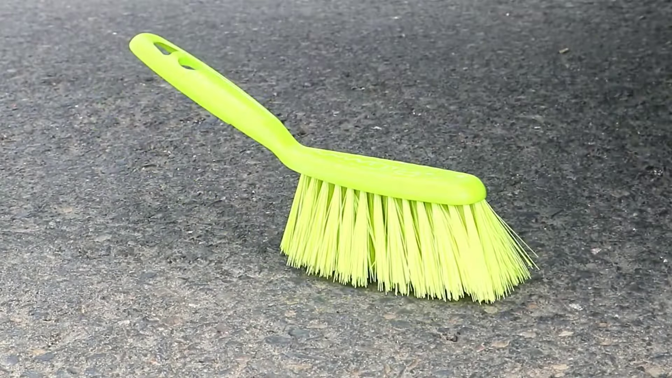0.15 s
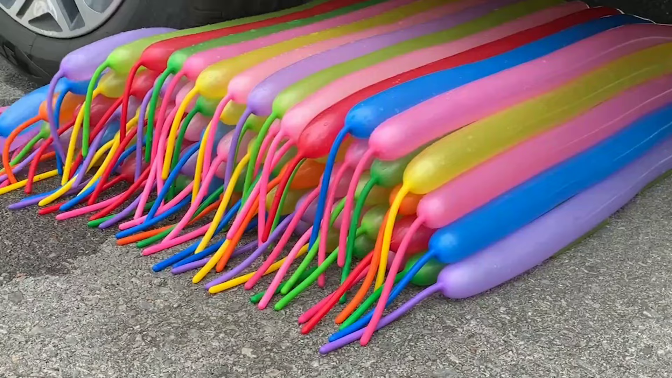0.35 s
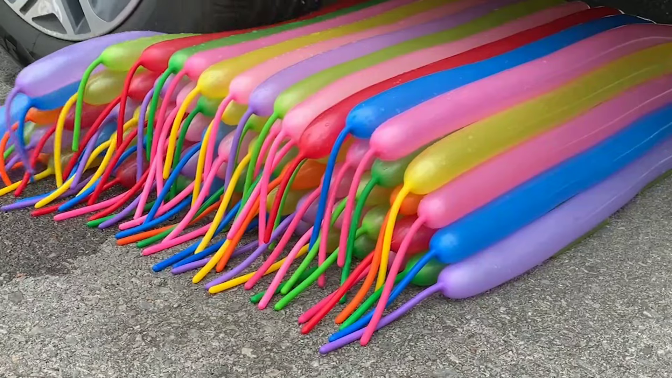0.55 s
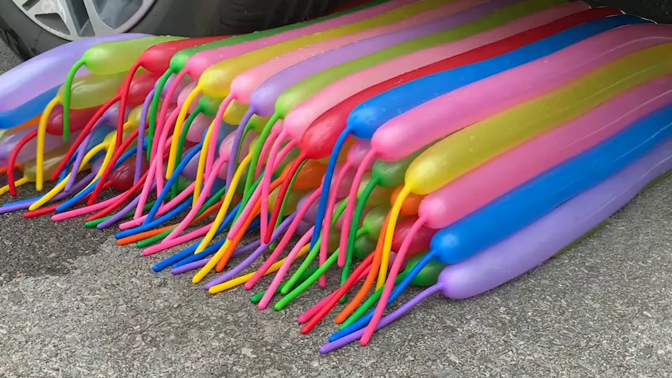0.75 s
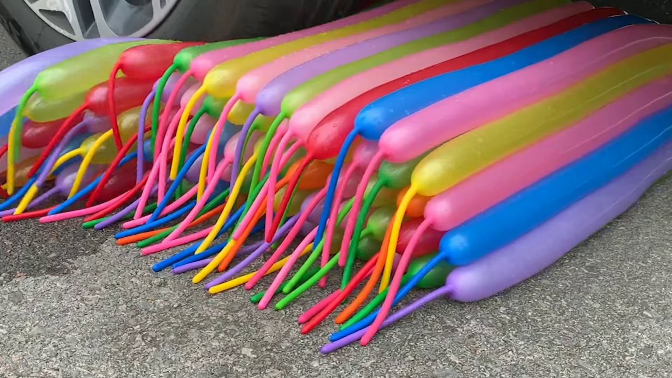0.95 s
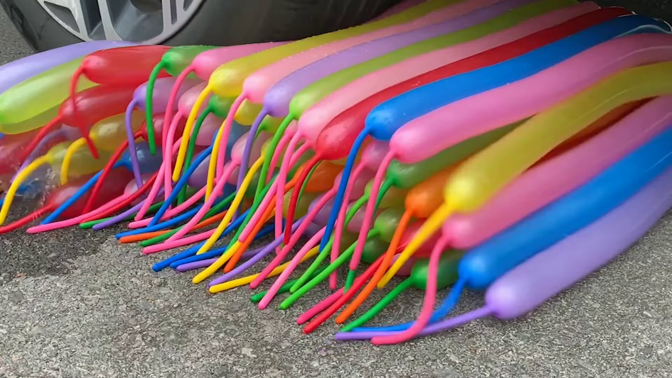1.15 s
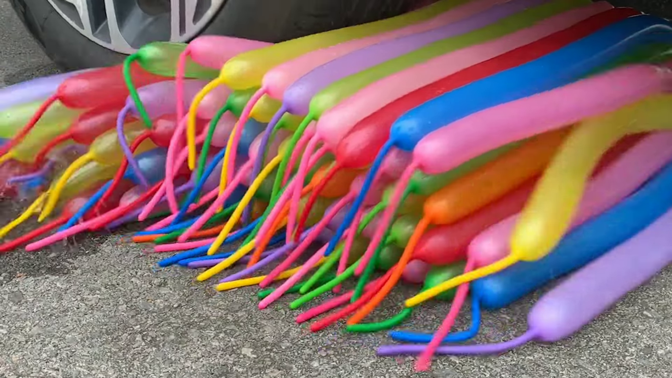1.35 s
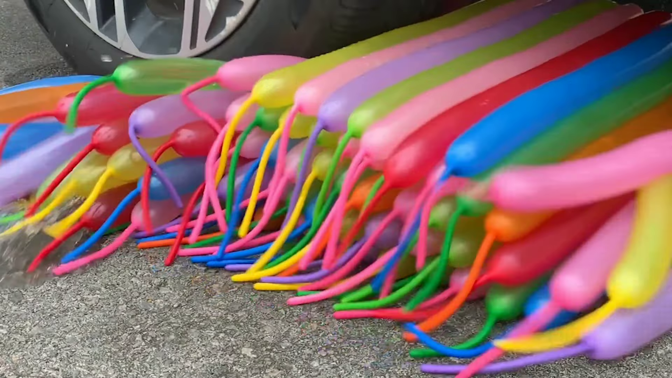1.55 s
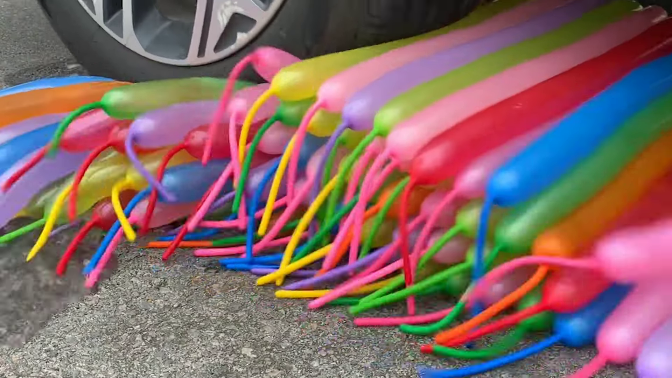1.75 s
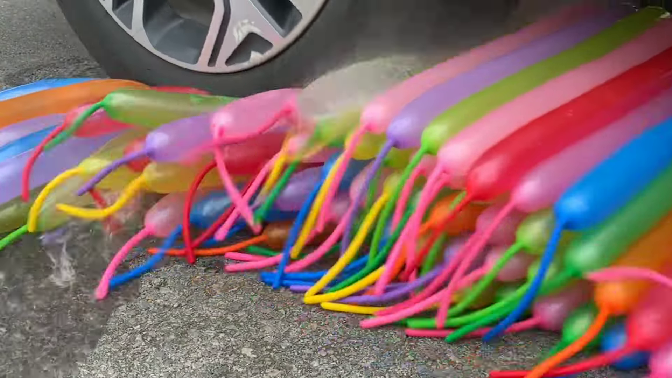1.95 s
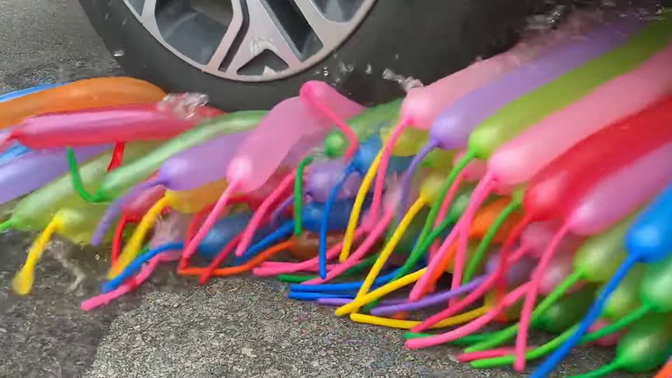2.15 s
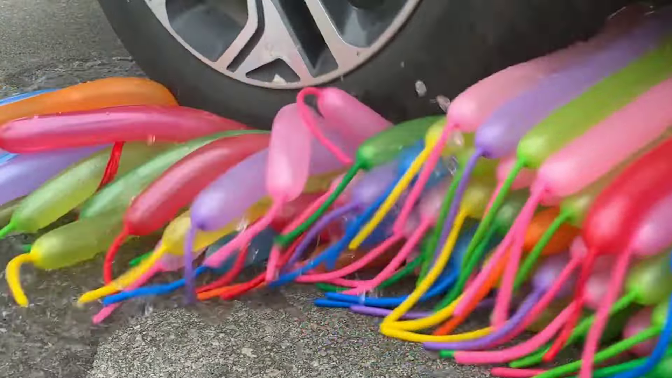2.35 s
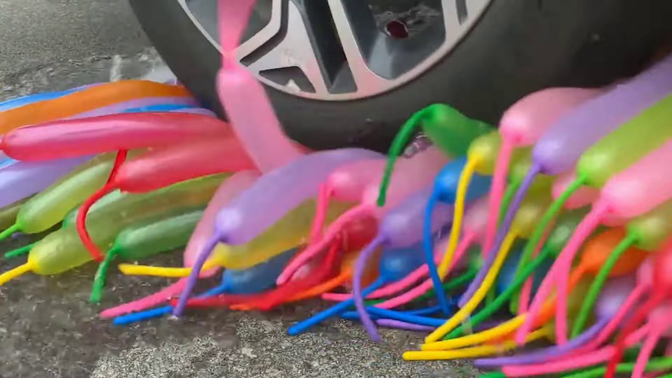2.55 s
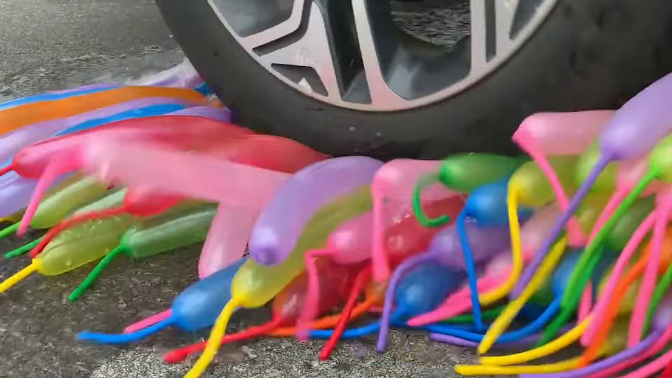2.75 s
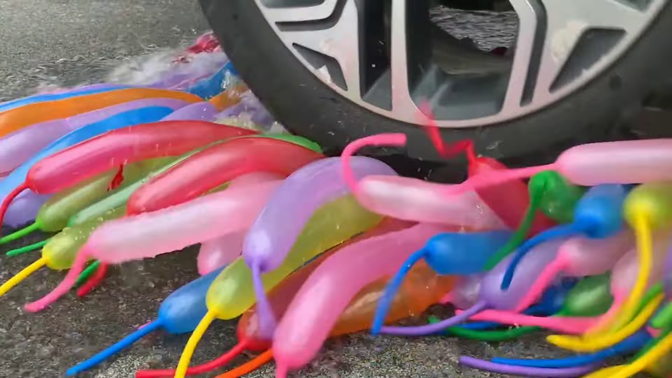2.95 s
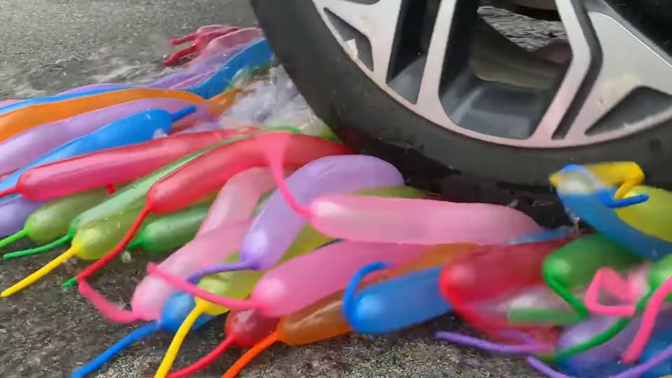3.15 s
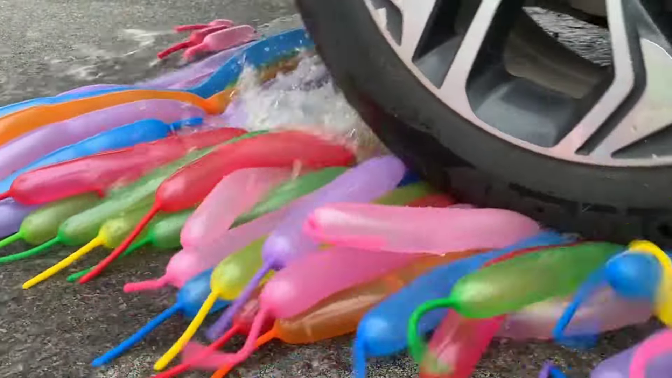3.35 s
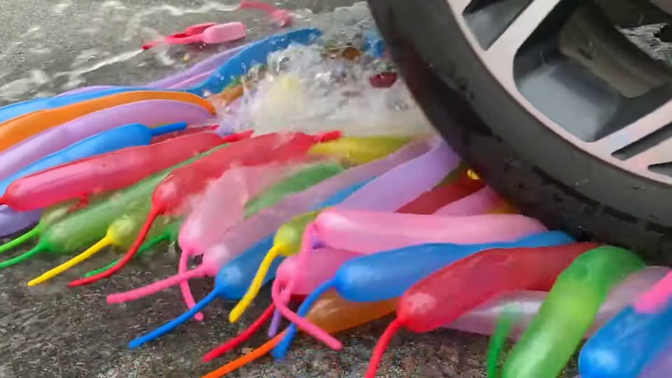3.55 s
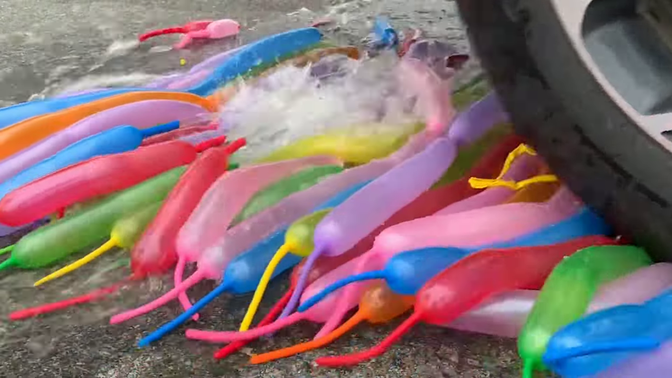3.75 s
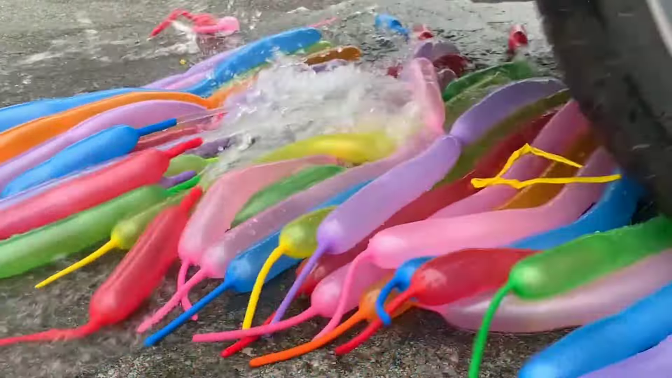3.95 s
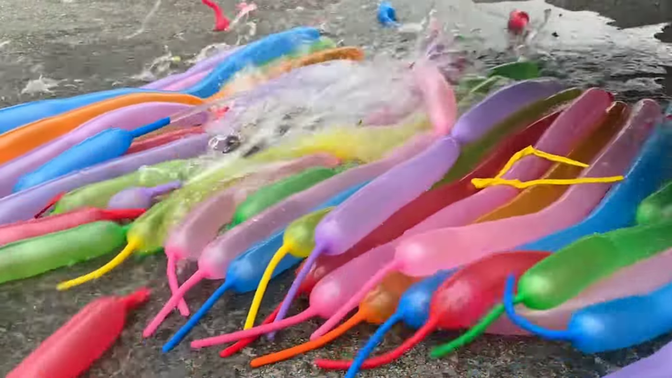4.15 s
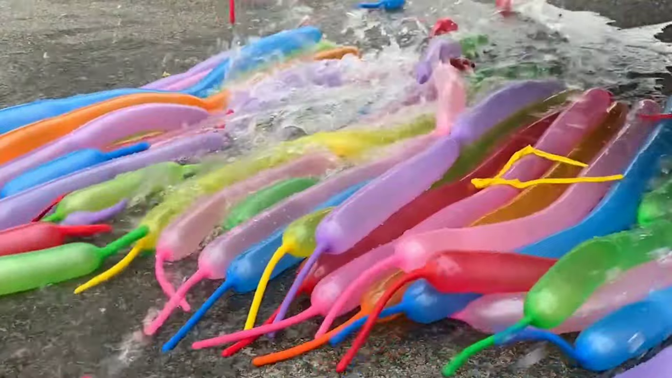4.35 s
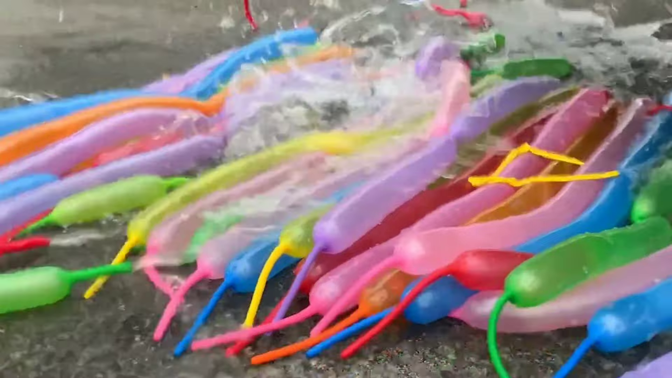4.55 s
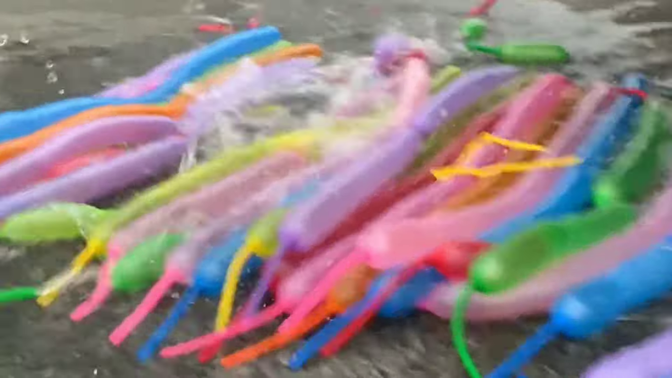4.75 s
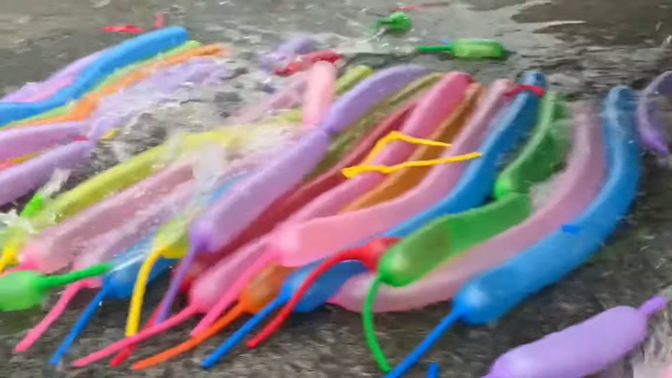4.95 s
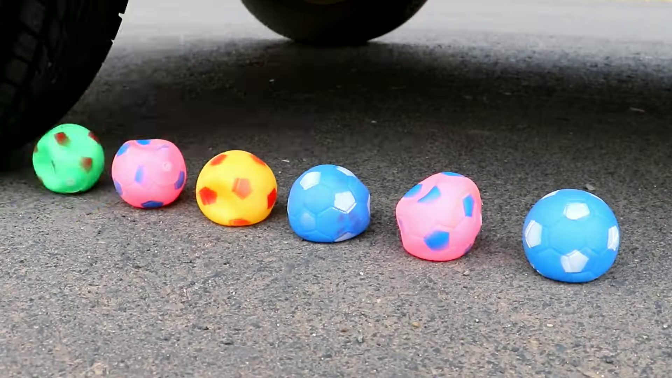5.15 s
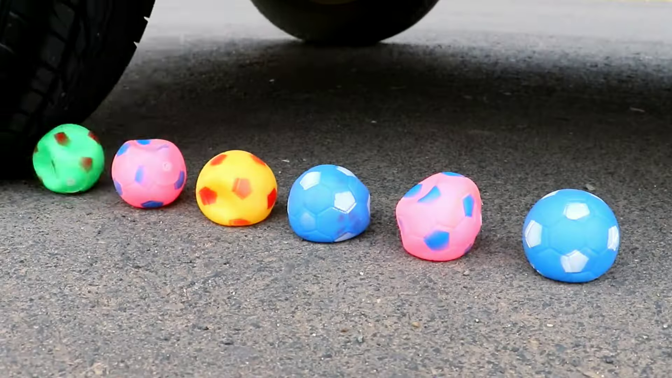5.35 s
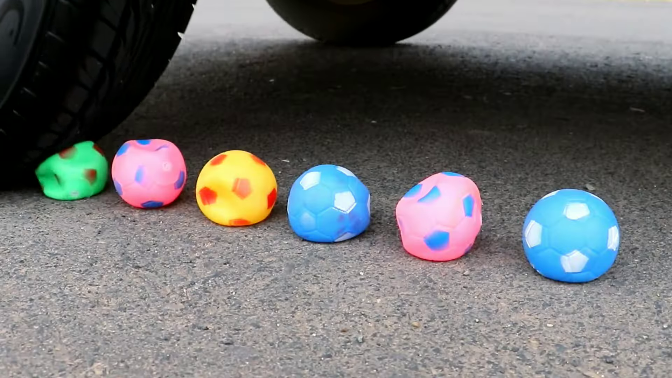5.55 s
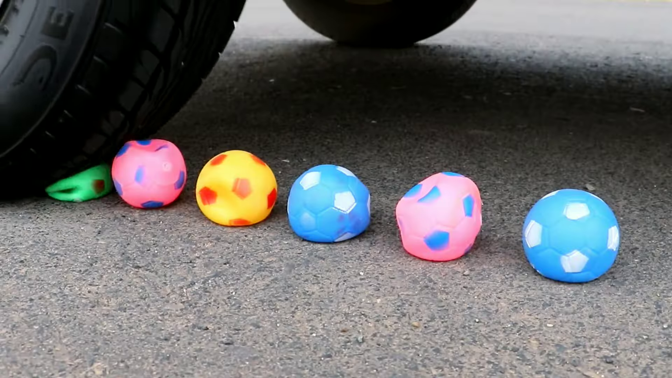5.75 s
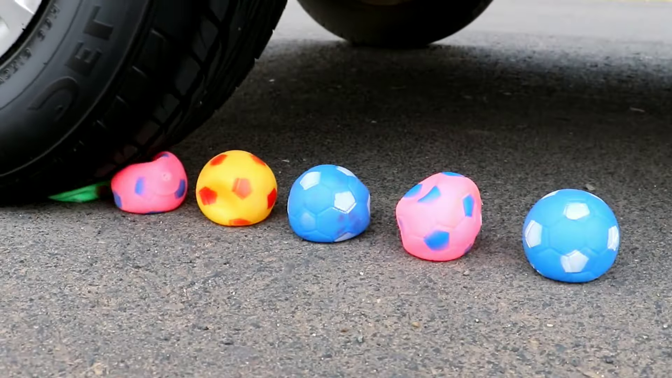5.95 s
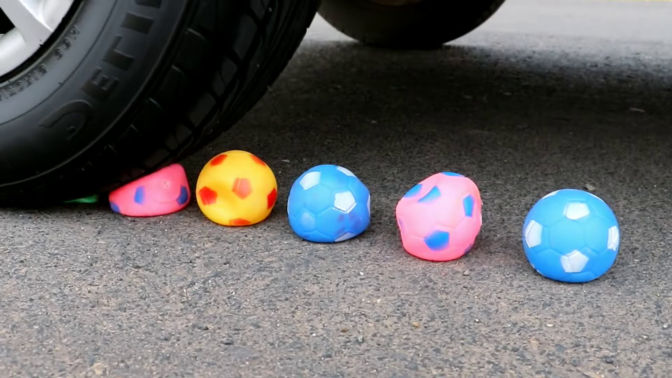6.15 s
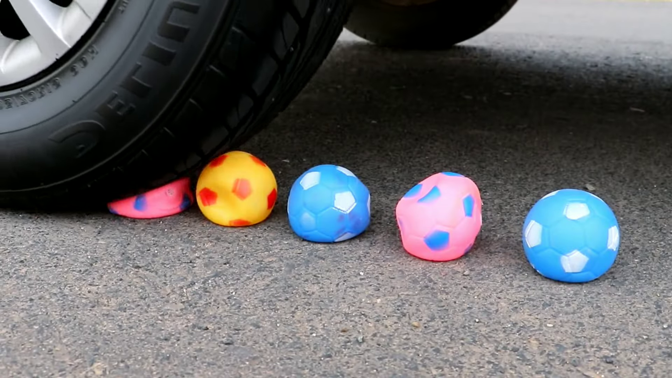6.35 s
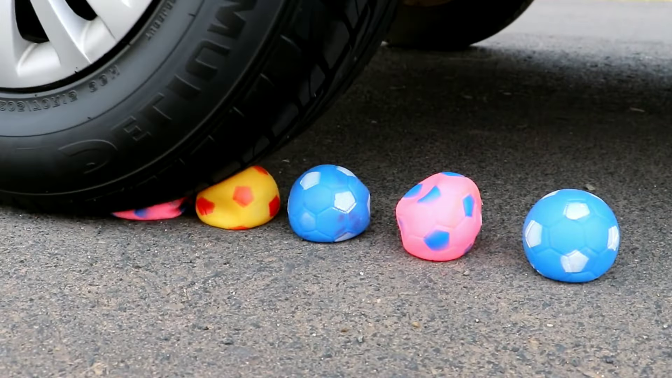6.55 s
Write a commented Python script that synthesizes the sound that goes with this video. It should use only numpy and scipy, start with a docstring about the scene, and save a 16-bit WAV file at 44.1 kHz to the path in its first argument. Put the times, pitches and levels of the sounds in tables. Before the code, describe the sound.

Near quiet on a roadside, with a small grit tick, then a faint tyre creak. A car tyre rolls onto long water balloons: sharp snaps, slapping splashes, short gushes, plopping air pockets and growing gurgle and spray over low rumble. An abrupt cut to quiet street air follows, where three squeaky balls squeal one by one, whistling and hissing. Close microphone, wide stereo for the water, squeaks centred.

```python
"""Asphalt roadside: a car tyre rolls over a heap of long water balloons, then, in a quieter spot, over squeaker balls.
Balloons snap, gush and splatter as shaped noise bursts; ringing air pockets and bubbles gurgle over the car's rumble.
Three rubber balls squeak one after another: harmonic reeds glide with the pressure, choke into a whistle,
and the last air hisses out as bright noise. Faint street air lies before the heap and under the balls."""
import sys
import numpy as np
from scipy import signal
from scipy.fft import rfft, irfft, next_fast_len
from scipy.io import wavfile
from scipy.ndimage import uniform_filter1d

SR = 44100
rng = np.random.default_rng(int(sys.argv[2]) if len(sys.argv) > 2 else 0)


def pcm_store(signal):
    """Save signal as 16-bit PCM."""
    levels = np.round(np.clip(np.atleast_2d(signal), -1, 1) * 32767)
    wavfile.write(sys.argv[1], SR, levels.astype(np.int16).T)


N = 291809
T = np.arange(N) / SR
HEAP_START, HEAP_END = .285, 5.186  # s
TOP_HZ = 15700  # upper band limit


def amp(db):
    """Decibels to gain."""
    return 10 ** (np.asarray(db) / 20)


def unit(x):
    """Scaled to rms 1."""
    return x / np.sqrt(np.mean(x ** 2) + 1e-20)


def along(points, hz):
    """(Hz, value) points read on a log frequency axis."""
    f, v = np.transpose(points)
    return np.interp(np.log(hz + 1), np.log(f + 1), v)


def curve(rows, t=T):
    """(s, value) points joined by straight lines, read at the times t."""
    s, value = np.transpose(rows)
    return np.interp(t, s, value)


def wobble(rate, size=N):
    """A smooth random curve, rate knots a second."""
    step = SR / rate
    knots = rng.standard_normal(int(size / step) + 4)
    fine = signal.resample_poly(knots, 8, 1)
    return np.interp(np.arange(size) * 8 / step, np.arange(len(fine)), fine)


def filtered(x, response):
    """x times a response of frequency."""
    size = x.shape[-1]
    padded = next_fast_len(size + 4096)
    hz = np.fft.rfftfreq(padded, 1 / SR)
    return irfft(rfft(x, padded) * response(hz), padded)[..., :size]


def coloured(x, spectrum, tilt_db=0):
    """x given a spectrum and a tilt per octave about 1 kHz, at rms 1."""
    def response(hz):
        octaves = np.log2(np.clip(hz, 200, 8000) / 1000)
        return amp(along(spectrum, hz) + tilt_db * octaves)
    return unit(filtered(x, response))


def lowered_above_8k(spectrum, loss_db):
    """The spectrum lowered by loss_db above 8 kHz; a negative loss leaves it as it is."""
    return [(hz, db - max(loss_db, 0) * (hz > 8000)) for hz, db in spectrum]


def noise(size=N):
    """Two unrelated white noises."""
    return rng.standard_normal((2, size))


def widened(pair, width):
    """The first signal in the centre, the second in opposite phase at the sides."""
    mid, side = pair
    return mid + width * np.array([side, -side])


def gate(start, end):
    """1 between two times, with 4 ms ramps."""
    return np.clip(np.minimum(T - start, end - T) / .004, 0, 1)


def span(start, end):
    """The sample times between two moments."""
    return np.arange(round(start * SR), round(end * SR)) / SR


def scattered(start, end, count):
    """Random moments, one in each equal part of a span."""
    return start + (end - start) * (np.arange(count) + rng.random(count)) / count


def add(out, x, s):
    """Mix x into out from time s."""
    part = out[:, max(round(s * SR), 0):][:, :x.shape[-1]]
    part += x[..., :part.shape[1]]


# Balloon skins snapping: t/s, crack level/dB, splash level/dB (both before their envelopes), air pocket f/Hz
SNAPS = [(1.246, -7, -4.5, 578), (1.8, -40, -18, 777), (1.998, -26, -10, 677), (2.053, -6.5, -11, 520),
         (2.388, -41, -21, 200), (2.969, -8.5, -4.5, 423), (3.105, -33, -17.5, 557),
         (3.526, -11.5, -19.5, 384), (3.709, -5.5, -18, 479), (3.856, -9.5, -15.5, 360),
         (4.289, -12, -10, 252), (4.491, -18, -10.5, 265.5), (4.557, -23, -6, 286), (5.11, -6.5, -7, 735)]
# Tone of the ripping skin: f/Hz, level/dB
CRACK_TONE = [(700, -21.5), (2200, -10.5), (3600, 3), (5500, -7), (7500, -16), (9500, -26.5),
              (15500, -29.5)]
# Tone of the slapping water: f/Hz, level/dB
SPLASH_TONE = [(60, -19.5), (190, 7), (450, -4), (900, 0.5), (1600, -12.5), (3000, -10.5), (8000, -60)]
SPLASH_T60_S = .11


def pops():
    """The skin rips in a burst of a few milliseconds; the freed water slaps and dies away over a longer tail."""
    out, t = np.zeros((2, N)), np.arange(SR // 4) / SR
    tail = amp(-60 * t / SPLASH_T60_S)
    rip = np.exp(-((t - .0055) / .0023) ** 2) + amp(-8) * tail
    for s, crack_db, splash_db, _ in SNAPS:
        crack_tone = lowered_above_8k(CRACK_TONE, 3.2 * (-26 - crack_db))
        crack = coloured(noise(len(t)), crack_tone) * (1 - np.exp(-t / .001)) * rip
        splash = coloured(noise(len(t)), SPLASH_TONE) * (1 - np.exp(-t / .0016)) * tail
        add(out, amp(crack_db) * crack + amp(splash_db) * splash, s)
    return out


# Jets from split balloons: crest t/s, level/dB (before JET_LIFT_DB), swell time constant/s,
# treble tilt/(dB per octave), air pocket f/Hz
JETS = [(1.275, -18, .025, -2, 213), (1.354, -20.5, .009, -6, 680), (1.405, -9, .011, -3, 474),
        (1.476, -26.5, 0.023, -3, 333), (1.611, -23.5, 0.012, -1, 515), (1.691, -26, 0.007, 1, 466),
        (1.82, -20.5, 0.011, -8.5, 220), (1.875, -20.5, 0.015, -3.5, 327), (2.029, -13, .011, 0.5, 980),
        (2.103, -23, 0.035, -0.5, 286), (2.861, -20.5, 0.0083, 4, 227), (2.925, -23.5, 0.0085, 0.5, 359),
        (3.536, -17.5, 0.015, 3.5, 231), (3.669, -12.5, .013, 0, 1100), (3.717, -11.5, 0.013, 0.5, 226),
        (3.816, -20.5, 0.012, 2.5, 350), (3.985, -17.5, 0.014, 1.5, 457), (4.057, -17.5, .014, 1, 440),
        (4.239, -12, 0.0094, 2.5, 296), (4.384, -19, 0.024, -1.5, 295), (4.454, -18, 0.013, 3.5, 344),
        (4.5, -13, 0.019, 1, 255), (4.599, -13, 0.011, 3, 290), (5.066, -15.5, 0.013, 4, 368)]
# Tone of a jet: f/Hz, level/dB
JET_TONE = [(80, -27.5), (200, 1.5), (600, 2), (1200, -1), (2300, -6.5), (3700, -4.5), (5500, -11.5),
            (7500, -22), (8600, -33.5), (15000, -37.5)]
JET_LIFT_DB = 5
DRAIN_OVER_SWELL = 1.17  # a jet dies away a little more slowly than it rises
SQUIRT_SWELL_S = .011
SQUIRT_DB, SQUIRT_SCATTER_DB = 2, 3.5  # level over the slosh setting, and how far it varies either way


def gushes():
    """Each jet swells as the split widens, flutters with the loose rubber and drains; squirts come at random."""
    out, t = np.zeros((2, N)), np.arange(-SR // 10, SR // 7) / SR

    def jet(swell, loss_db, tilt_db):
        fluttering = amp(1.9 * wobble(349.4, size=len(t))) * noise(len(t))
        flow = np.exp(-np.abs(t) / np.where(t < 0, swell, DRAIN_OVER_SWELL * swell))
        return flow * coloured(fluttering, lowered_above_8k(JET_TONE, loss_db), tilt_db)

    for s, db, swell, tilt_db, _ in JETS:
        add(out, amp(db + JET_LIFT_DB) * jet(swell, 4 * (-16 - db), tilt_db), s + t[0])
    for s in scattered(WET_START_S, HEAP_END, count=22):
        slosh_db = SLOSH_DB + SLOSH_GROWTH_DB * flood(s)
        db = slosh_db + SQUIRT_DB + SQUIRT_SCATTER_DB * rng.uniform(-1, 1)
        add(out, amp(db) * jet(SQUIRT_SWELL_S, loss_db=23, tilt_db=1.5), s + t[0])
    return out


PLOP_CYCLES, PLOP_DELAY_S = 33, .00654  # cycles per 60 dB of decay; lag behind a snap
POP_PLOP_DB, GUSH_PLOP_DB = -1.5, -.5  # relative to the tabled splash or jet level


def plops():
    """Every snap and jet leaves an air pocket ringing at its own pitch, rising and unsteady as its wall moves."""
    out, t = np.zeros((2, N)), np.arange(SR // 6) / SR
    pockets = [(s + PLOP_DELAY_S, hz, db + POP_PLOP_DB) for s, _, db, hz in SNAPS]
    pockets += [(s, hz, db + GUSH_PLOP_DB) for s, db, *_, hz in JETS]
    right_lag = np.array([[0], [-.8]])  # radians
    for s, hz, db in pockets:
        t60 = PLOP_CYCLES / hz
        pitch = hz * (1 + .11 * (t / t60 - .2) + .024 * wobble(200, size=len(t)))
        tone = np.sin(2 * np.pi * np.cumsum(pitch) / SR + right_lag)
        ring = tone * (1 - np.exp(-t / .0005)) * amp(-60 * t / t60)
        add(out, amp(db) * ring, s)
    return out


FLOOD_START_S, FLOOD_FULL_S = 2.05, 4.52


def flood(t):
    """How much water is loose, 0-1, growing steadily while the tyre crosses the heap."""
    return np.clip((t - FLOOD_START_S) / (FLOOD_FULL_S - FLOOD_START_S), 0, 1)


def bubbles(count, size, hz, spread, cycles, scatter_db):
    """Two channels of small damped rings whose pitch rises as they die."""
    t = np.arange(size) / SR
    when, side, chance = rng.random((count, 3)).T[:, :, None]
    pitch = np.clip(hz * np.exp(spread * rng.standard_normal((count, 1))), 170, 6500)
    age = t * pitch / cycles
    tone = np.sin(2 * np.pi * pitch * t * (1 + .092 * np.minimum(age, 2)))
    ring = tone * np.exp(-3 * age) * (1 - t / t[-1])
    ring *= amp(-scatter_db * np.log(chance + .04))
    ring *= np.minimum(t * pitch, 1)  # a bubble takes a cycle to start
    index = (when * (N - size)).astype(int) + N * (side > .5) + np.arange(size)
    return unit(np.bincount(index.ravel(), ring.ravel(), 2 * N).reshape(2, N))


def patchy(x, depth_db):
    """Gains that wander over time and frequency, as splashes hit rubber, puddle or road."""
    z = signal.stft(x, nperseg=512)[2]
    field = uniform_filter1d(rng.standard_normal(z.shape[1:]), size=9, axis=0)
    field = uniform_filter1d(field, size=8, axis=1)
    return unit(signal.istft(z * amp(depth_db * unit(field)), nperseg=512)[1][:, :N])


# Tone of water sloshing in the heap: f/Hz, level/dB
SLOSH_TONE = [(53, -48.5), (90, -8), (248, 1.5), (323, -2.5), (442, -2), (527, -7.5), (739, -4.5),
              (1300, -14), (1400, -13.5), (1800, -10.5), (2340, -42), (3960, -120)]
# Tone of pattering drops: f/Hz, level/dB
SPRAY_TONE = [(500, -12.5), (1000, -1), (1700, -1.5), (2400, -0.5), (3700, 2.5), (5000, -3.5),
              (6300, -12.5), (7600, -18), (8200, -68.5), (15000, -65.5)]
WET_START_S = 1.19
SLOSH_DB, SLOSH_GROWTH_DB = -29, 9.5  # level before the flood, and its gain at full flood
SPRAY_DB, SPRAY_GROWTH_DB = -38.5, 20


def water():
    """Pockets of air gurgle in the heap while drops patter on rubber and asphalt."""
    gurgle = bubbles(count=1500, size=900, hz=425.7, spread=.456, cycles=23.5, scatter_db=1.5)
    slosh = unit(.74 * gurgle + coloured(noise(), SLOSH_TONE))
    drops = bubbles(count=9000, size=160, hz=2547, spread=.6, cycles=5, scatter_db=-.5)
    spray = patchy(coloured(drops + 2.43 * noise(), SPRAY_TONE), depth_db=2.96)
    surge = wobble(22)
    slosh_db = SLOSH_DB + SLOSH_GROWTH_DB * flood(T) + 1.8 * surge
    spray_db = SPRAY_DB + SPRAY_GROWTH_DB * flood(T) + .93 * surge
    return gate(WET_START_S, HEAP_END) * (amp(slosh_db) * slosh + amp(spray_db) * spray)


# Likeness of the two microphone ports by the heap: f/Hz, correlation (0-1)
PORT_LIKENESS = [(50, .88), (160, 0.77), (300, 0.63), (480, 0.2), (760, 0.15), (1400, 0.059), (2500, 0.38),
                 (3700, 0.61), (6000, 0.79), (9000, 0.17)]
# Phase by which the left port leads: f/Hz, lead/rad
PORT_LEAD = [(40, 0), (280, 1.4), (500, 3), (1000, 6), (2900, 9.3), (4700, 3.1), (6500, -3.1), (16000, -36)]


def ports(pair):
    """Two unrelated signals become left and right: partly alike, and shifted in phase."""
    def blend(hz):
        turn = np.arccos(np.clip(along(PORT_LIKENESS, hz), 0, 1)) / 2
        return np.array([np.cos(turn), np.sin(turn)])

    def shift(hz):
        lead = np.interp(hz, *np.transpose(PORT_LEAD))
        return np.exp(.5j * np.outer([1, -1], lead))

    mid, side = filtered(pair, blend)
    return filtered(np.array([mid + side, mid - side]), shift)


# How the ball's shell radiates the reed: f/Hz, level/dB
SHELL_TONE = [(450, -36), (850, 0), (1400, 2.5), (1900, 2), (2700, -3.5), (3700, -2.5), (5000, 1),
              (6300, -4.5), (7600, 2), (8500, -1), (9700, -15.5), (11000, -21), (15000, -33.5)]
# Turbulent air at the reed: f/Hz, level/dB
RUSH_TONE = [(40, -4), (150, -12), (500, -11.5), (1000, -9), (2500, -8), (5000, 9), (8500, -9.5),
             (10500, -7), (14500, -7.5)]


def reed(t, pitch, db, rough, tilt_db):
    """A reed chops air into a harmonic tone; driven hard, it shakes, beats unevenly and air rushes past."""
    size = len(t)
    shaken = pitch * (1 + .067 * rough * wobble(1400, size) + .0037 * wobble(150, size))
    phase = 2 * np.pi * np.cumsum(shaken) / SR
    order = np.arange(1, 21)[:, None]
    overtone_hz = order * pitch
    strength = amp(along(SHELL_TONE, overtone_hz) + tilt_db * np.log2(order)) * (overtone_hz < TOP_HZ)
    strength /= np.sqrt(np.sum(strength ** 2, axis=0) / 2 + 1e-12)
    # each overtone wavers by itself, the fundamental stays even
    shimmer = amp(3.6 * (order > 1) * np.array([wobble(61.6, size) for _ in order]))
    tone = np.sum(shimmer * strength * np.sin(order * phase), axis=0)
    # every third beat is stronger: lines between the harmonics, for notes below 2200 Hz
    rasp = np.minimum(2 * rough, .6) * np.sin(phase / 3 + wobble(80, size)) * (pitch < 2200)
    flutter = 1.18 * rough * wobble(500, size)
    # the small vent radiates no bass
    tone = filtered(tone * (1.05 + rasp + flutter), lambda hz: 1 - 1 / (1 + (hz / 740) ** 14))
    rush = widened(coloured(noise(size), RUSH_TONE), .45)
    return amp(db) * (tone + (.023 + .5 * rough) * rush)


FADE_DB = 32  # depth of every attack and release below the held level


def fade_db(t, attack, release):
    """Attack, hold and release over the times t, in dB."""
    ramps = np.minimum((t - t[0]) / attack, (t[-1] - t) / release)
    return FADE_DB * (np.minimum(ramps, 1) - 1)


# Balls being squeezed: start t/s, end t/s, attack/s, level/dB (before pressure), overtone tilt/(dB per octave),
# tilt lost at full pressure/(dB per octave), roughness gained/(per octave of pitch)
SQUEEZE_NOTES = [(5.52, 5.681, 0.041, -18.5, 0, -2, 0.3), (5.902, 6.212, 0.011, -22, 3.5, 4.5, 0),
                 (6.494, 6.7, 0.011, -21, -2.5, 8, 0.2)]
# Reed pitch of each ball in turn: t/s, f/Hz
FIRST_GLIDE = [(5.52, 888.2), (5.554, 898), (5.59, 970), (5.608, 1038), (5.614, 1202), (5.628, 1246),
               (5.65, 1737), (5.685, 1866)]
SECOND_GLIDE = [(5.903, 899), (5.995, 1050), (6.089, 1393), (6.109, 1361), (6.123, 1672), (6.161, 1795),
                (6.191, 1895), (6.225, 2043)]
THIRD_GLIDE = [(6.495, 914), (6.569, 1004), (6.585, 993), (6.615, 1046)]
REST_HZ, REST_ROUGH = 900, .059  # the reed at the lightest pressure
PRESSURE_DB, PRESSURE_OCTAVES = 9, .49  # louder with pitch, levelling off beyond this interval
RELEASE_S, RELEASE_ROUGH = .032, .97


def squeezes():
    """Rising pressure drives the reed higher and louder; the note breaks up and fades as the air runs out."""
    out = np.zeros((2, N))
    for note, glide in zip(SQUEEZE_NOTES, (FIRST_GLIDE, SECOND_GLIDE, THIRD_GLIDE)):
        start, end, attack, db, tilt_db, loss_db, roughening = note
        t = span(start, end)
        pitch = curve(glide, t)
        octaves = np.maximum(np.log2(pitch / REST_HZ), 0)
        pressure = np.tanh(octaves / PRESSURE_OCTAVES)
        level_db = db + PRESSURE_DB * pressure + fade_db(t, attack, RELEASE_S)
        rough = REST_ROUGH + roughening * octaves + RELEASE_ROUGH * np.exp((t - end) / RELEASE_S)
        add(out, reed(t, pitch, level_db, np.clip(rough, 0, 1), tilt_db - loss_db * pressure), start)
    return out


# Nearly flat balls choking onto other notes, and (third row) a low undertone two octaves under the second
# ball's squeezed note: start t/s, climb/s, end t/s, from f/Hz, to f/Hz, level/dB, # starting roughness (0-1),
# overtone tilt/(dB per octave)
CHOKED_NOTES = [(5.646, .022, 5.692, 2664, 3040, -16, 0.6, -4),
                (5.648, .053, 5.728, 4070, 5150, -10.5, .7, -13.5),
                (6.139, .06, 6.208, 429, 482, -22.5, 0.3, 3.5),
                (6.17, 0.044, 6.222, 2675, 2980, -19, .9, -3),
                (6.2, 0.053, 6.26, 4620, 4920, -33, 0.7, -11)]
CHOKE_ATTACK_S, CHOKE_RELEASE_S = .011, .018


def chokes():
    """The choked reed climbs unsteadily, and turns pure once it settles on its note."""
    out = np.zeros((2, N))
    for start, climb, end, from_hz, to_hz, db, start_rough, tilt_db in CHOKED_NOTES:
        t = span(start, end)
        settled = np.minimum((t - start) / climb, 1)
        pitch = from_hz + (to_hz - from_hz) * settled
        level_db = db + fade_db(t, CHOKE_ATTACK_S, CHOKE_RELEASE_S)
        rough = start_rough * np.sqrt(np.abs(1 - settled))
        add(out, reed(t, pitch, level_db, rough, tilt_db), start)
    return out


# Choked reeds coming free: start t/s, swoop t/s, end t/s, swoop width/s, whistle f/Hz, low f/Hz
# (both before the sag), whistle level/dB
SWOOP_NOTES = [(5.996, 6.052, 6.17, .0085, 4635, 1153, -7.5), (6.499, 6.533, 6.7, 0.0065, 4566, 943, -15.5)]
SAG_OCTAVES_PER_S, SWOOP_LOSS_DB, WHISTLE_ROUGH = 2.5, 10.5, .3  # roughness is on top of REST_ROUGH
LOW_TILT_DB, WHISTLE_TILT_DB = -1, -7  # overtones per octave: the whistle is purer than the low note
SWOOP_ATTACK_S, SWOOP_RELEASE_S = .02, .053


def swoops():
    """A rough whistle drops to a softer low note, sagging all the while as the pressure eases."""
    out = np.zeros((2, N))
    for start, s, end, width, whistle_hz, low_hz, db in SWOOP_NOTES:
        t = span(start, end)
        choked = np.exp(-np.exp(np.minimum((t - s) / width, 10)))  # 1 falls to 0 around s
        sag = 2 ** (-SAG_OCTAVES_PER_S * (t - s))
        pitch = (low_hz + (whistle_hz - low_hz) * choked) * sag
        loss_db = SWOOP_LOSS_DB * (1 - np.sqrt(choked))
        level_db = db - loss_db + fade_db(t, SWOOP_ATTACK_S, SWOOP_RELEASE_S)
        tilt_db = LOW_TILT_DB + (WHISTLE_TILT_DB - LOW_TILT_DB) * choked
        rough = REST_ROUGH + WHISTLE_ROUGH * np.sqrt(choked)
        add(out, reed(t, pitch, level_db, rough, tilt_db), start)
    return out


# Air hissing from flattened balls: start t/s, crest t/s, end t/s, crest level/dB, time to sink to a trickle/s
PUFFS = [(5.733, 5.78, 6.27, -26.5, 0.15), (6.333, 6.438, 6.7, -37, 0.036)]
# Tone of the escaping air: f/Hz, level/dB
HISS_TONE = [(1470, -57.5), (2500, -37.5), (4010, -20.5), (4850, -1), (5440, -18), (6290, -6.5), (7720, -3),
             (10700, -8), (12500, -1), (15400, -7)]
TRICKLE_LOSS_DB, HISS_RELEASE_S = 12, .065


def vents():
    """The last air leaves a ball as noise, in a puff that sinks to a trickle."""
    out = np.zeros((2, N))
    for start, crest, end, db, sink in PUFFS:
        t = span(start, end)
        sunk = np.clip((t - crest) / sink, 0, 1)
        level_db = db + fade_db(t, crest - start, HISS_RELEASE_S) - TRICKLE_LOSS_DB * sunk
        add(out, amp(level_db + wobble(50, size=len(t))) * coloured(noise(len(t)), HISS_TONE), start)
    return widened(out, .3)


def balls():
    """The squeakers with a short answer from the road and the car's underside, and their hiss."""
    squeaks = squeezes() + chokes() + swoops()
    t = np.arange(SR // 16) / SR
    tail = noise(len(t)) * amp(-60 * t / .091)
    echo = signal.oaconvolve(squeaks, tail / np.linalg.norm(tail[0]), axes=1)[:, :N]
    return squeaks + amp(-13) * echo + vents()


# The car approaches, meets the heap, then climbs onto it: t/s, rumble level/dB
CAR_LEVEL = [(.3, -60), (1.12, -55.5), (1.22, -36.5), (2.32, -40.5), (2.48, -30.5), (4.1, -30),
             (4.45, -29.5), (5.15, -30.5)]
# Soft bumps of the tyre: t/s, level/dB, half length/s
TYRE_BUMPS = [(0.311, -39.5, 0.013), (0.631, -43, 0.0061), (1.48, -34, 0.044), (1.806, -30, 0.034),
              (2.065, -30, 0.037)]
# Tone of the car's rumble: f/Hz, level/dB
RUMBLE_TONE = [(11, -30.5), (18, -1), (38, 2), (81, -4.5), (160, -4), (210, -38), (350, -120)]
# Tone of the creaking tread: f/Hz, level/dB
CREAK_TONE = [(60, -11), (130, -6), (240, 4.5), (380, -2.5), (600, -4), (1000, -9.5), (1800, -16.5),
              (3500, -20.5), (5000, -35.5), (9000, -54)]
CREAK_DB, CREAK_GROWTH_DB = -55, 5.5  # the tread creaks louder as it nears the heap
SCRATCH_DB = -57.5
SCRAPE_DB, SCRAPE_S, SCRAPE_WIDTH_S = -49.5, .807, .094  # one scrape over grit


def car():
    """Low noise rumble of the car, the tread creaking and scratching on grit, and a few soft bumps."""
    rumble = amp(curve(CAR_LEVEL)) * coloured(noise(), RUMBLE_TONE)
    creak_db = CREAK_DB + CREAK_GROWTH_DB * np.interp(T, [HEAP_START, WET_START_S], [0, 1])
    creak = amp(creak_db + 3.5 * wobble(25)) * coloured(noise(), CREAK_TONE)
    scraping = amp(SCRATCH_DB) + amp(SCRAPE_DB) * np.exp(-((T - SCRAPE_S) / SCRAPE_WIDTH_S) ** 2)
    scratch = scraping * amp(2.3 * wobble(120)) * coloured(noise(), SPRAY_TONE, tilt_db=-7.5)
    bump_envelope = sum(amp(db) * np.exp(-((T - s) / width) ** 2) for s, db, width in TYRE_BUMPS)
    bumps = bump_envelope * coloured(noise(), [(100, 6), (300, -10.5), (2000, -33), (9000, -51.5)])
    return gate(HEAP_START, HEAP_END) * (rumble + creak + scratch + bumps)


# Small ticks of grit: t/s, level/dB (before a 6 dB cut)
GRIT_TICKS = [(0.12, -29), (.625, -45.5), (.664, -46), (.837, -40)]


def grit():
    """Small dry ticks: noise with a very fast decay and a weak longer tail."""
    out, t = np.zeros((2, N)), np.arange(SR // 8) / SR
    decay = amp(-60 * t / .0071) + amp(-18.5 - 60 * t / .22)
    for s, db in GRIT_TICKS:
        add(out, amp(db - 6) * coloured(noise(len(t)), JET_TONE, tilt_db=1.5) * decay, s)
    return out


# Tone of the outdoor air: f/Hz, level/dB
STREET_TONE = [(20, -16), (100, -6), (200, -7.5), (400, -3.5), (1000, -4), (2200, -10), (3600, -12.5),
               (5500, -23.5), (9000, -32), (15000, -58.5)]
HUM_HZ = 383  # centre of a slightly wavering hum


def street():
    """Faint air noise, nearly alike on both sides; it falls silent at 0.26 s and returns for the balls, where a
    hum joins it."""
    by_balls = gate(HEAP_END - .01, 7)
    level = amp(-59.5) * gate(-1, .264) + amp(-57.5) * by_balls
    air = level * widened(coloured(noise(), STREET_TONE), .25)
    hum_phase = 2 * np.pi * np.cumsum(HUM_HZ * (1 + .0077 * wobble(30))) / SR
    hum = amp(-65.5 + 2.5 * wobble(6.2)) * np.sin(hum_phase)
    return air + by_balls * hum


def scene():
    """The heap of balloons, then the row of balls."""
    heap = ports(pops() + gushes() + water() + car()) + plops()
    return heap * gate(HEAP_START, HEAP_END) + balls() + grit() + street()


def record(dry):
    """The loudest peaks are rounded off at full scale; nothing passes above the band limit."""
    rounded = dry / (1 + np.abs(dry) ** 6) ** (1 / 6)
    return filtered(rounded, lambda hz: hz < TOP_HZ)


dry = scene()
out = record(dry)
pcm_store(out)
```